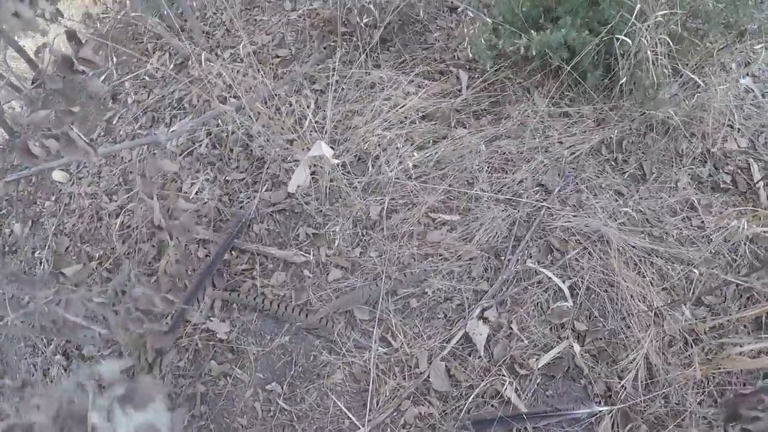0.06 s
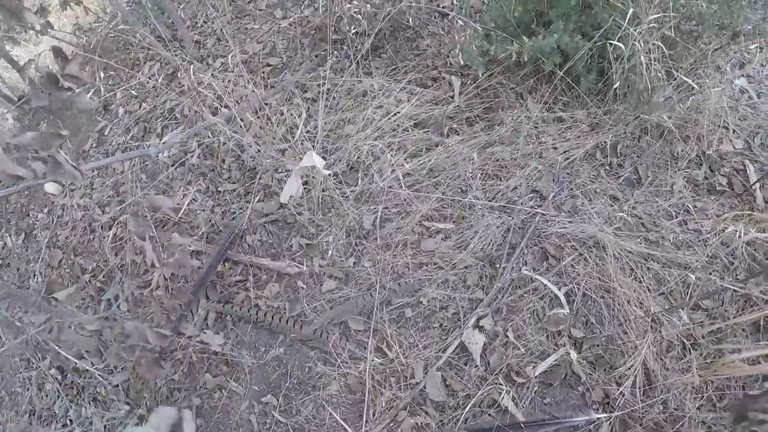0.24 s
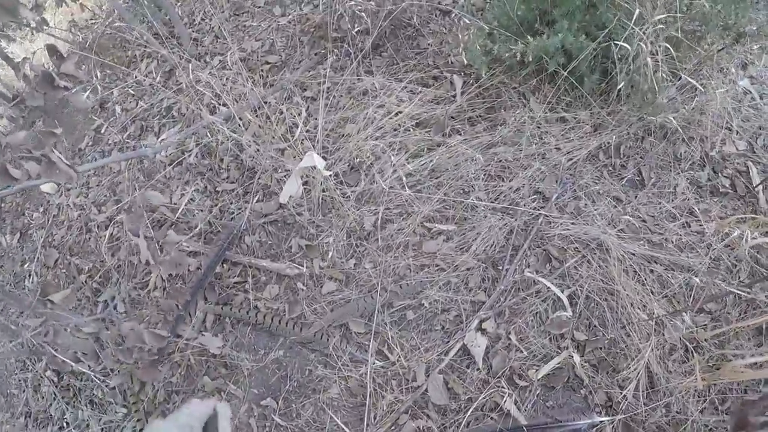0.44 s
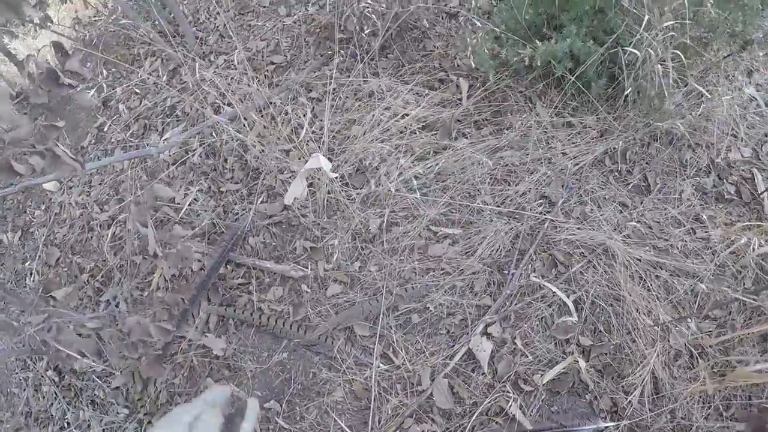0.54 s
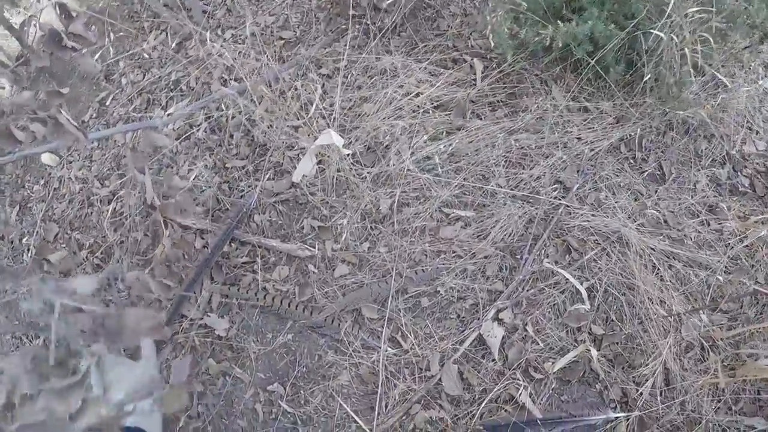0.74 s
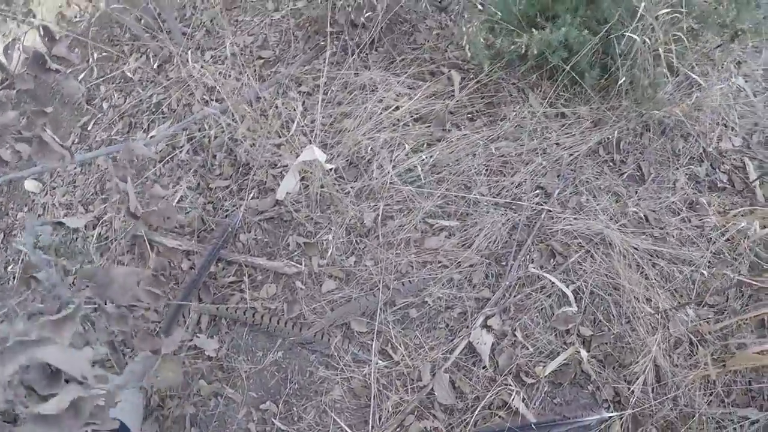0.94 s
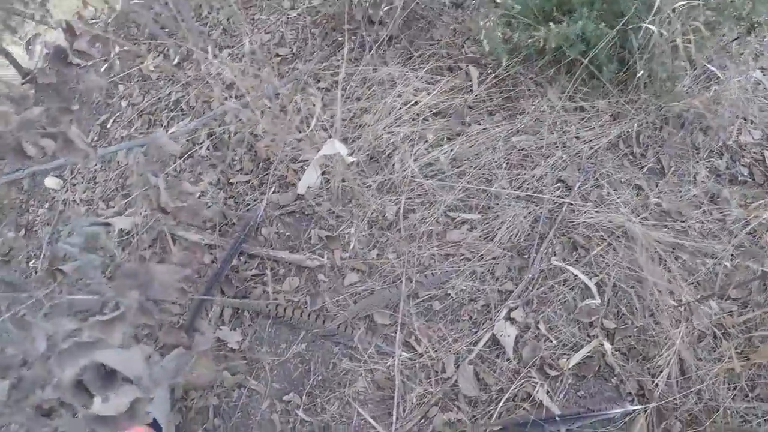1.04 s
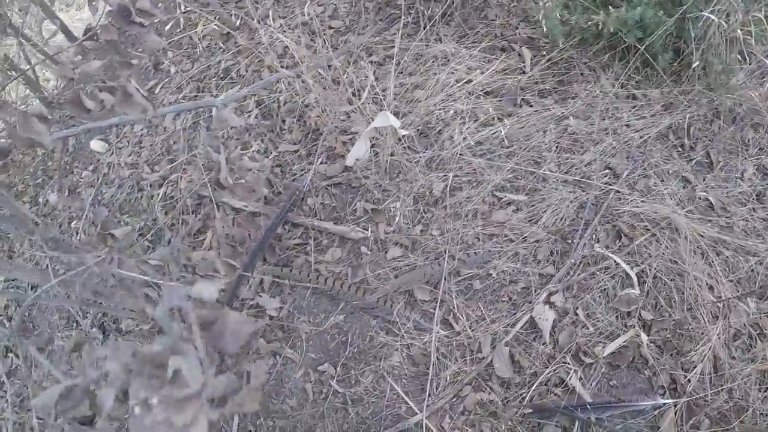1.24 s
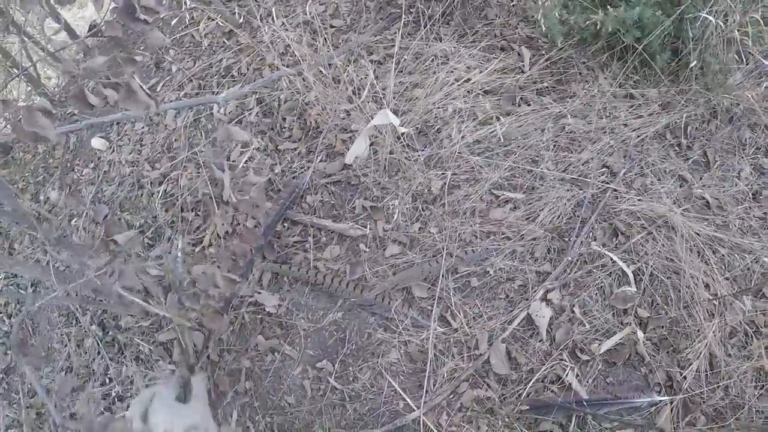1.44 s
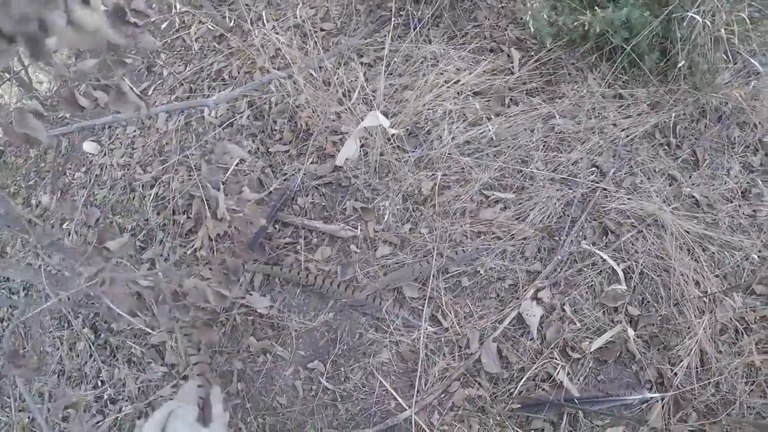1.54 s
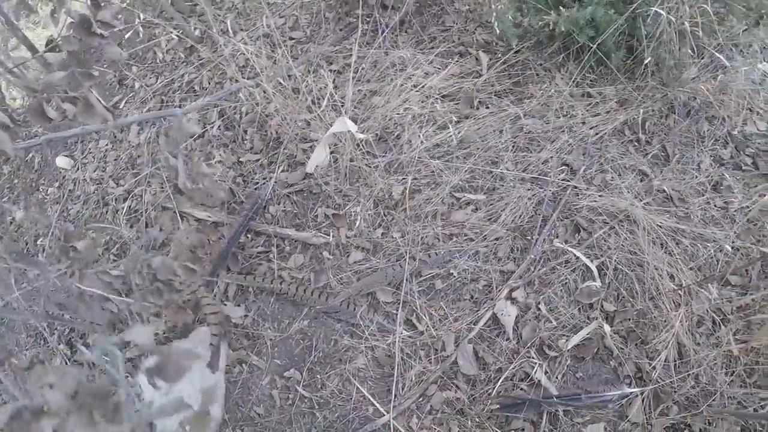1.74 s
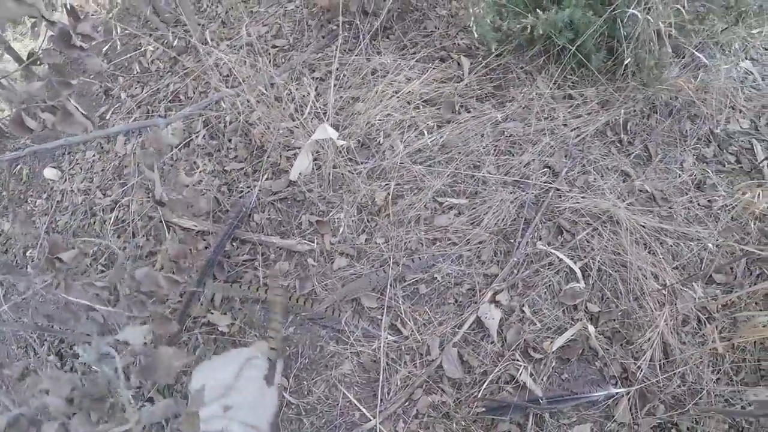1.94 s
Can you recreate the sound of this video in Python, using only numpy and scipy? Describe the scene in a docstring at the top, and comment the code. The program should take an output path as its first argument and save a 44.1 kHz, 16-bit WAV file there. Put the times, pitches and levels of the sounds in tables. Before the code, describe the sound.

Gusty wind buffets the microphone while dry leaves and grass rustle and crackle.

```python
"""Gusty wind buffets a close microphone with a low rumble and stirs dry leaves and grass.
Gusts and eddies push on the microphone. Countless small leaf contacts make a constant rustle;
single leaves buckle and snap, or scrape over each other in short bursts.
Something knocks softly, and a twig breaks at the end. A faint motor-like hum lies in the air behind."""
import sys
import numpy as np
from scipy import signal
from scipy.fft import rfft, irfft, next_fast_len
from scipy.io import wavfile
from scipy.ndimage import uniform_filter1d, map_coordinates

SR = 44100
rng = np.random.default_rng(int(sys.argv[2]) if len(sys.argv) > 2 else 0)


def transcribe(u):
    """Save the signal u as a 16-bit wav file named by the first command-line argument.

    u: samples, shape (n,) or (channels, n), limited to [-1, 1]; the rate is SR.
    q: integer samples, one column per channel.
    """
    v = np.clip(np.atleast_2d(u).T, -1, 1)
    q = np.round(v * 32767).astype(np.int16)
    wavfile.write(sys.argv[1], SR, q)


N = 88200

# Response of one dry leaf. Each row: frequency in Hz, relative level in dB.
DRY_LEAF_SPECTRUM = [(200,-38),(700,-8),(1400,-8.5),(2300,-4),(3300,1),(4200,-3),(4800,2),(5400,-1),(6500,0),(8000,-3),(12000,-3.5),(16000,-7.5)]


def buffeting():
    """Gusts push on the microphone and shed small, higher eddies."""
    # Gust and eddy envelopes. Each row: time in seconds, relative level in dB.
    gust_levels = [(0,-31.5),(.12,-40.5),(.205,-30),(.24,-14),(.3,-31),(.345,-15),(.375,-25.5),(.44,-8.5),(.49,-23),(.53,-19),(.565,-27.5),(.64,-17),(.68,-26),(.75,-12),(.81,-17.5),(.87,-20.5),(.915,-17.5),(.95,-33),(.98,-13.5),(1.14,-16.5),(1.18,-28),(1.23,-23),(1.33,-25.5),(1.37,-33.5),(1.455,-14.5),(1.52,-30.5),(1.61,-19.5),(1.67,-26),(1.73,-23),(1.81,-16),(1.88,-39),(2,-35)]
    eddy_levels = [(0,-57),(.2,-42),(.225,-32),(.28,-31.5),(.34,-31.5),(.375,-39),(.45,-25),(.53,-29),(.58,-39.5),(.65,-33),(.71,-26.5),(.76,-23),(.83,-30.5),(.93,-41),(.985,-28.5),(1.06,-36.5),(1.15,-31),(1.2,-39),(1.4,-62),(1.425,-30),(1.48,-31),(1.51,-64),(1.6,-37),(1.69,-45),(1.74,-37),(1.79,-36),(1.86,-60),(2,-51)]
    # Gust and eddy pressure spectra. Each row: frequency in Hz, relative level in dB.
    rumble_spectrum = [(10,-30),(20,-5.5),(29,7),(41,-0.5),(55,-3.5),(72,-17.5),(95,-33),(150,-70.5),(300,-77)]
    eddy_spectrum = [(30,-11.5),(55,-6),(75,10.5),(100,3.5),(125,-1),(180,-8),(250,-22.5),(350,-25),(500,-38),(900,-59.5),(2000,-107)]
    (gust_db,), (eddy_db,) = curves(gust_levels), curves(eddy_levels)
    rumble = amp(gust_db - 2) * turbulence(rumble_spectrum, window_samples=1300)
    eddies = amp(eddy_db - 2.5) * turbulence(eddy_spectrum, window_samples=800)
    return rumble + eddies


def turbulence(spectrum, window_samples):
    """Pressure noise of even strength, so that an envelope alone shapes its level."""
    pressure = noise(spectrum)
    power = uniform_filter1d(uniform_filter1d(pressure ** 2, window_samples), window_samples)
    return pressure / np.sqrt(np.abs(power) + 1e-9)


def eddy_thumps():
    """Each strong eddy is one push and pull of pressure; smaller ones pass faster."""
    # Each row: centre in seconds, peak in dB, dominant frequency in Hz.
    eddies = [(.24,-18.5,52),(.342,-20,68),(0.534,-20,85),(.74,-28,230),(.981,-14,58),(1.06,-25.5,160),(1.084,-13,50),(1.138,-16,60),(1.43,-31,183),(1.81,-17.5,52)]
    out, t = np.zeros(N), np.arange(N) / SR
    for centre_s, peak_db, hz in eddies:
        u = np.pi * hz * (t - centre_s)
        out += amp(peak_db) * (1 - 2 * u ** 2) * np.exp(-u ** 2)
    return out


def rustle():
    """Countless small contacts of leaves and grass, with sparse nearer ticks among them."""
    # Rustle envelope. Each row: time in seconds, relative body and treble levels in dB.
    stir_levels = [(0,-45.5,-48.5),(.16,-44.5,-46.5),(.28,-48,-49.5),(.52,-51,-55),(.72,-50,-53.5),(.87,-51,-54.5),(.96,-47.5,-56),(1.15,-42,-53.5),(1.28,-47,-49.5),(1.4,-49.5,-52.5),(1.48,-49.5,-48.5),(1.53,-57,-64),(1.62,-45.5,-45),(1.7,-47.5,-51),(1.79,-52,-60),(1.85,-55.5,-58),(2,-50,-55)]
    # Foliage spectra. Each row: frequency in Hz, relative level in dB.
    body_spectrum = [(500,-19),(1200,-7.5),(2000,-6),(2900,0.5),(4200,-0.5),(4800,7.5),(5300,5),(6200,3.5),(7300,-5),(9000,-14.5),(16000,-78)]
    treble_spectrum = [(3000,-13),(6500,4.5),(8500,-5.5),(12000,-5.5),(16000,-10)]
    body_db, treble_db = curves(stir_levels)
    dense = unit(grains(N, per_s=2500, spread_db=7.5) + amp(1.5) * rng.standard_normal(N))
    ticks = amp(-15.5) * grains(N, per_s=41, spread_db=9.0)
    contacts = (dense + ticks) * amp(1.74 * wobble(knots_per_s=48.63))
    body = amp(body_db - 0.5) * colour(contacts, body_spectrum)[:N]
    treble = amp(treble_db - 1) * colour(contacts, treble_spectrum)[:N]
    return body + treble


def leaf_snaps():
    """A stiff leaf buckles: a sharp crack and a brief shiver at its own pitch."""
    # Each row: start in seconds, relative level in dB, tilt in dB/octave, ring in Hz, ring gain in dB.
    buckles = [(0.025,-32,-1.5,4800,4),(0.0431,-35,-2,4900,32),(0.1213,-36,-2,2580,14),(0.1325,-24,1.5,3080,6),(0.1369,-27.5,3.5,10500,-6),(.149,-26.5,0,6140,3),(.152,-29.5,2,4050,-1),
               (0.173,-33,2,3670,12),(0.197,-30,-2,3570,4),(0.2578,-33.5,-1,4700,6),(0.296,-33,0,3800,13),(0.3247,-31,-3,12600,14),(0.4713,-34.5,-1,3400,15),(0.4995,-33.5,-3,2320,14),(0.515,-36,-7,5550,10),
               (.668,-31,-6,5150,17),(.694,-42,-1,5330,28),(0.7298,-39.5,-5.5,2000,12),(0.7671,-33.5,-2,4970,8),(0.8841,-38.5,-6,4970,12),(0.978,-36,4.5,5770,11),(1.0695,-23.5,-3.5,4700,22),
               (1.080,-30.5,-1.5,4800,12),(1.0948,-33,-3.5,4670,14),(1.158,-31.5,-3,4830,21),(1.5838,-33,2,2900,2),(1.586,-30,0.5,2900,5),(1.5946,-29.5,-6.5,5200,5),(1.629,-31.5,-5,4660,13),(1.6398,-37,-11,3300,-3),(1.688,-34.5,-2,5620,11),(1.72,-36,-3,5620,11),
               (1.7333,-28,0,4660,11),(1.749,-27.5,-2.5,4780,15.5),(1.7615,-30.5,-1,4700,16),(1.983,-36,-1,4670,20)]
    decay_s, tail_s = 0.0006, 0.0036
    out, t = np.zeros(N), np.arange(SR // 20) / SR
    envelope = np.exp(-t / decay_s) + amp(-8) * np.exp(-t / tail_s)
    crack = amp(8) * (t == 0)
    for start_s, db, tilt, ring_hz, ring_db in buckles:
        shiver = envelope * rng.choice([-1, 1], len(t))
        snap = colour(shiver + crack, DRY_LEAF_SPECTRUM, tilt, ring_hz, ring_db)
        add(out, start_s, amp(db + 15.5) * snap / np.linalg.norm(snap))
    return out


def leaf_scrapes():
    """A leaf edge catches and slips: a quick burst of dense grains that dies away."""
    # Each row: start and decay time in seconds, relative level in dB, tilt in dB/octave,
    # ring in Hz, ring gain in dB.
    slips = [(0.034,0.016,-38.5,5.5,6100,13),(0.136,0.021,-37,-2,3540,5),(0.171,0.016,-42,8,5800,12),(0.32,0.0081,-40,-4,3500,2),(0.511,0.02,-42.5,-2.5,5700,6),(0.553,0.051,-43,-3,4800,3),(0.666,0.012,-37.5,0,5100,5),
             (0.828,0.012,-39.5,4,8660,8.5),(0.909,0.053,-44.5,-5.5,5860,20),(0.989,0.026,-39.5,-4,4550,9.5),(1.129,0.052,-45.5,3,5460,16),(1.208,0.047,-43,0,5280,15),(1.235,0.042,-42.5,-1,6460,12),
             (1.259,0.013,-39.5,-6,4700,16),(1.332,0.008,-40,1,5000,0),(1.437,0.011,-34.5,2.5,2400,15.5),(1.564,0.0086,-40.5,-5.5,4830,10),(1.581,0.021,-37.5,-1,2840,11),
             (1.627,0.026,-40,-0.5,4660,4),(1.678,0.012,-40,-3,5900,7),(1.765,0.025,-45,0,4760,0),(1.942,0.01,-40,-1.5,2900,4),(1.974,0.03,-43.5,-2,2800,5),(1.993,.015,-41,-2,4800,7)]
    rise_s = 0.0026
    out, t = np.zeros(N), np.arange(SR // 10) / SR
    for start_s, decay_s, db, tilt, ring_hz, ring_db in slips:
        envelope = np.minimum(t / rise_s, 1) * np.exp(-(t / decay_s) ** 2)
        friction = envelope * grains(len(t), per_s=2200, spread_db=2)
        add(out, start_s, amp(db - 1.5) * colour(friction, DRY_LEAF_SPECTRUM, tilt, ring_hz, ring_db))
    return out


def twig_break():
    """A thin twig breaks: one hard click and a short splintering."""
    # Twig response. Each row: frequency in Hz, relative level in dB.
    twig_spectrum = [(150,-32),(500,1),(1000,-8.5),(1700,-2.5),(2600,1),(4000,-5.5),(6000,-10),(10000,-19),(16000,-24)]
    start_s, splinter_decay_s = 1.974, 0.0016
    out, t = np.zeros(N), np.arange(SR // 50) / SR
    click = t == 0
    splinters = amp(-25) * np.exp(-t / splinter_decay_s) * rng.standard_normal(len(t))
    add(out, start_s, amp(-10.5) * colour(click + splinters, twig_spectrum))
    return out


def knocks():
    """Dull, well damped taps, as of twigs."""
    # Each row: start in seconds, relative level in dB, pitch ratio.
    taps = [(0.137,-42.5,0.81),(1.297,-42.5,0.92),(1.6396,-36,0.97)]
    # Wood modes at pitch ratio 1. Each row: frequency in Hz, relative level in dB, T60 in seconds.
    wood_modes = [(387,4,0.031),(530,4,0.015),(762,2.5,0.025),(930,-2.5,0.0059)]
    rise_s = 0.00016
    out, t = np.zeros(N), np.arange(SR // 10) / SR
    for start_s, db, pitch in taps:
        ring = np.zeros(len(t))
        for hz, mode_db, t60_s in wood_modes:
            envelope = amp(mode_db - 60 * t * pitch / t60_s)
            ring += envelope * np.sin(2 * np.pi * (hz * pitch * t + rng.random()))
        add(out, start_s, amp(db) * ring * (1 - np.exp(-t / rise_s)))
    return out


def distant_hum():
    """Motor-like harmonics, slightly unsteady in pitch and level."""
    # Each row: harmonic number, level in dB.
    harmonics = [(2,-44),(3,-50.5),(4,-51.5),(6,-56.5),(7,-65),(8,-57.5),(9,-67.5),(10,-59),(12,-68)]
    fundamental_hz = 42.9 * (1 + 0.0057 * wobble(knots_per_s=6.39))
    phase = 2 * np.pi * np.cumsum(fundamental_hz) / SR
    out = np.zeros(N)
    for number, db in harmonics:
        gain = amp(db + 1.1 * wobble(knots_per_s=3.82))
        out += gain * np.sin(number * phase + 2 * np.pi * rng.random())
    return out


def open_air():
    """Faint, steady outdoor noise."""
    # Each row: frequency in Hz, relative level in dB.
    air_spectrum = [(20,11),(35,-7.5),(55,-19),(90,-0.5),(170,-10.5),(400,-8),(600,-12.5),(1000,-19.5),(2000,-22),(6000,-27),(16000,-29.5)]
    return amp(-46.5) * noise(air_spectrum)


def amp(db):
    """Decibels to gain."""
    return 10 ** (np.asarray(db) / 20)


def unit(x):
    """Scale to rms 1."""
    return x / np.sqrt(np.mean(x ** 2) + 1e-20)


def curves(rows):
    """One value per sample for each column after the time."""
    times_s, *columns = np.transpose(rows)
    return [np.interp(np.arange(N) / SR, times_s, column) for column in columns]


def wobble(knots_per_s):
    """Smooth random curve."""
    knots = rng.standard_normal(int(N * knots_per_s / SR) + 4)
    return map_coordinates(knots, [np.arange(N) * knots_per_s / SR])


def colour(x, spectrum, tilt_db_per_octave=0, ring_hz=5000, ring_db=0):
    """Causal filter of energy 1 through (Hz, dB) points, with a treble tilt and one resonance."""
    size, tilt_from_hz, ring_width_octaves = 16384, 1700, 0.16
    octave = np.log2(np.fft.rfftfreq(size, 1 / SR) + 1)
    hz, db = np.transpose(spectrum)
    base_db = np.interp(octave, np.log2(hz + 1), db)
    treble_db = tilt_db_per_octave * np.maximum(octave - np.log2(tilt_from_hz), 0)
    resonance_db = ring_db / (1 + ((octave - np.log2(ring_hz)) / ring_width_octaves) ** 2)
    cepstrum = irfft(np.log(amp(base_db + treble_db + resonance_db)))
    cepstrum[1:size // 2] *= 2  # fold for minimum phase
    cepstrum[size // 2 + 1:] = 0
    response = irfft(np.exp(rfft(cepstrum)))
    return signal.fftconvolve(x, response / np.linalg.norm(response))


def noise(spectrum):
    """Steady coloured noise of rms 1."""
    return unit(colour(rng.standard_normal(N + SR), spectrum)[SR:SR + N])


def grains(n, per_s, spread_db):
    """Tiny impulses of uneven size at random moments, rms 1."""
    hits = rng.random(n) < per_s / SR
    signs = rng.choice([-1, 1], n)
    sizes = amp(spread_db * np.minimum(rng.exponential(size=n), np.pi))
    return unit(hits * signs * sizes)


def add(out, start_s, x):
    """Mix x into out from start_s."""
    i = max(round(start_s * SR), 0)
    out[i:i + len(x)] += x[:len(out[i:i + len(x)])]


def scene():
    """All sources at one microphone."""
    wind = buffeting() + eddy_thumps()
    background = distant_hum() + open_air()
    leaves = rustle() + leaf_snaps() + leaf_scrapes()
    wood = twig_break() + knocks()
    return (wind + leaves + wood + background)[None]


def record(dry):
    """Brick-wall low-pass."""
    cutoff_hz = 15400
    size = next_fast_len(N + SR // 2)
    passband = np.fft.rfftfreq(size, 1 / SR) < cutoff_hz
    return irfft(rfft(dry, size) * passband, size)[..., :N]


dry = scene()
out = record(dry)
transcribe(out)
```